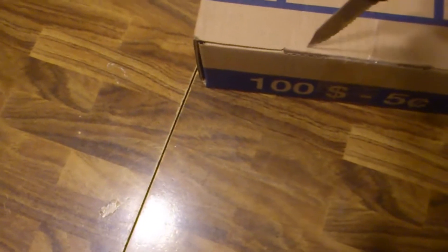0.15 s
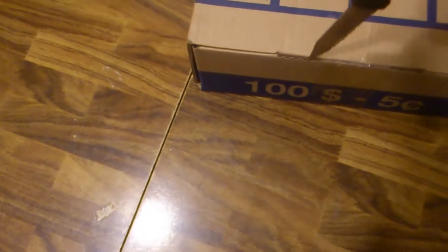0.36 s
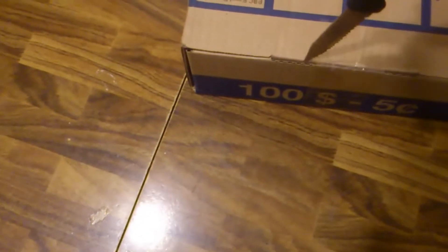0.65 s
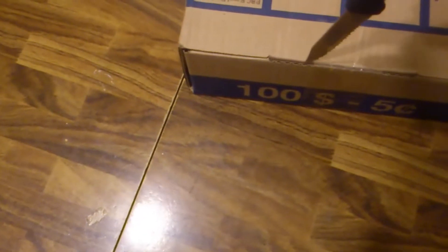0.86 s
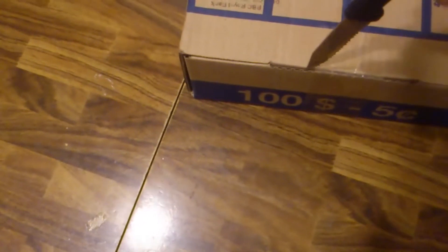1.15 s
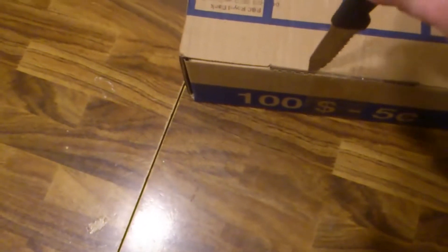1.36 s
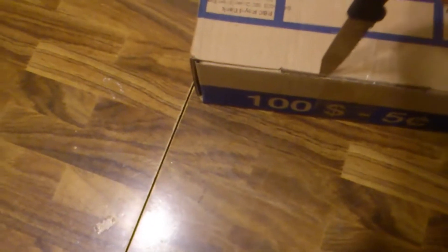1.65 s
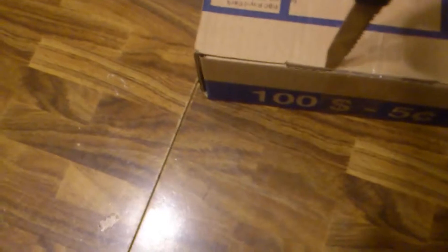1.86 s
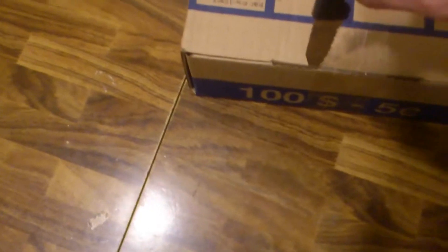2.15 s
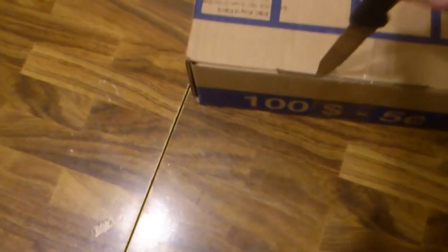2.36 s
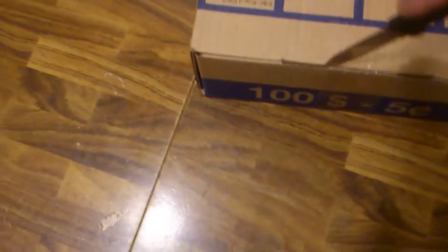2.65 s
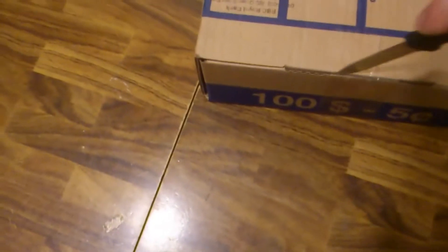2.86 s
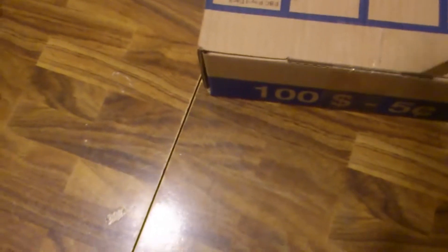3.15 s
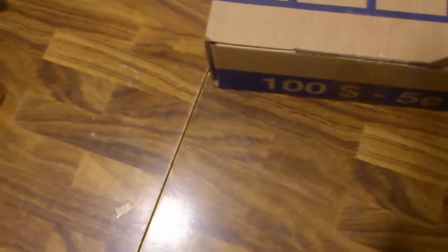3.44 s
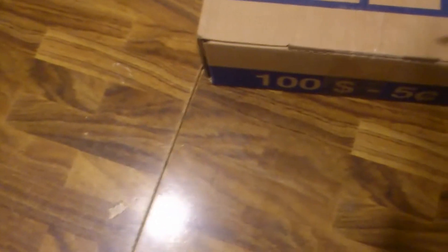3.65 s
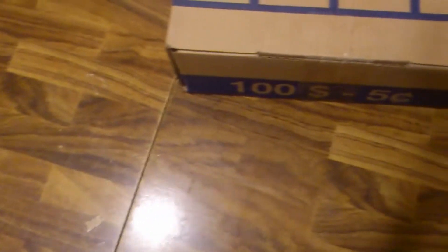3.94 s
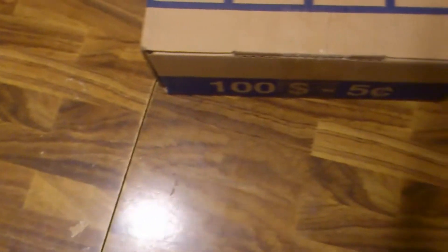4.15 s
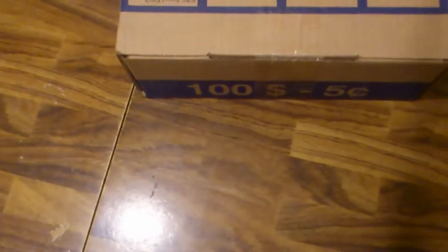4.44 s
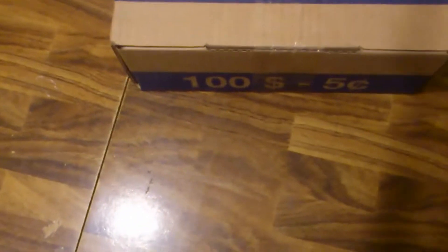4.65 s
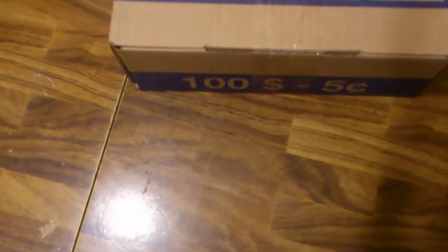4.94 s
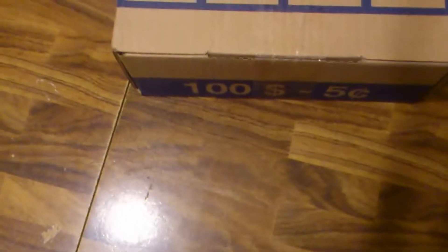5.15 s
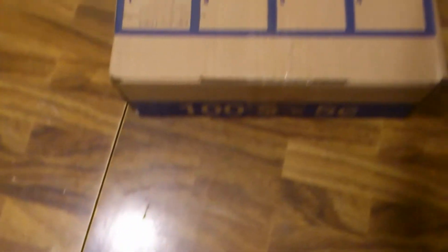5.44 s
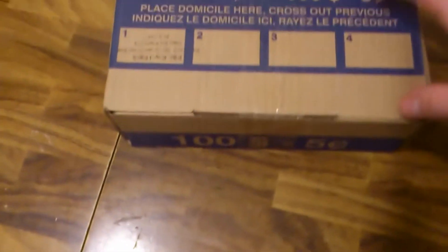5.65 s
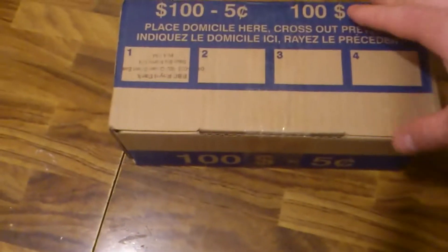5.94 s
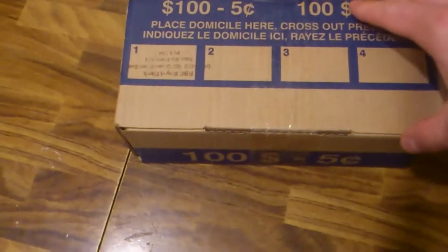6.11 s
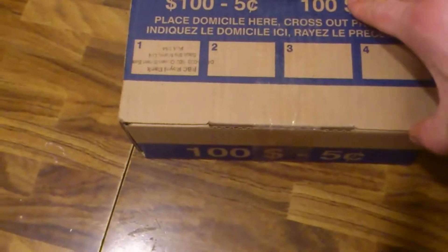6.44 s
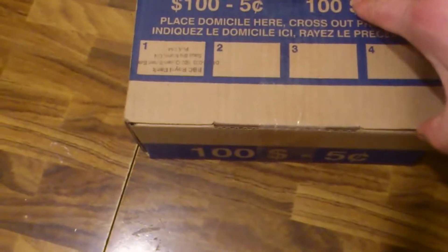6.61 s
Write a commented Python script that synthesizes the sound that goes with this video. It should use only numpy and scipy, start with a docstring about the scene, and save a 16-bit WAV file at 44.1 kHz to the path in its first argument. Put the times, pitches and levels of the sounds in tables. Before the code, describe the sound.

A knife snaps through tape on a cardboard box with sharp cracks and scrapes, then is laid down clattering before farther knocks and hand rustle.

```python
"""A knife pokes at and cuts through the tape of a cardboard box on a wooden table in a small quiet room:
tape snaps are noise bursts, the thumping box is a bank of decaying modes, and dragging is stick-slip grains.
The knife is laid down and bounces on ringing modes; knocks and a rattle sound farther off; a hand slides over
the cardboard. Heavy blows boom in table modes; noise echoes make the room, over filtered hiss and a low hum."""
import sys
import numpy as np
from scipy import signal
from scipy.fft import rfft, irfft
from scipy.io import wavfile

SR = 44100
rng = np.random.default_rng(int(sys.argv[2]) if len(sys.argv) > 2 else 0)


def how_loud(loudness_db):
    """Turn decibels into a plain amplitude multiplier (0 dB gives 1, 20 dB gives 10)."""
    steps = np.asarray(loudness_db, float) / 20
    return 10 ** steps


def wrap_up_sound(samples):
    """Save the sound to the file named by the first command line argument, as 16-bit audio."""
    columns = np.atleast_2d(samples).T
    # keep every value between -1 and 1, then stretch to whole-number steps
    tamed = np.clip(columns, -1, 1)
    steps = np.round(tamed * 32767).astype(np.int16)
    wavfile.write(sys.argv[1], SR, steps)


N = 298776

# Snaps and taps on the box:
# (time [s], crack peak [dB], crack centre [Hz], thump level [dB], thump centre [Hz])
TAPE_SNAPS = [(0.0677, -25, 2270, -41.5, 725), (0.0774, -33, 4670, -63, 422),
              (0.0929, -37, 1660, -35.5, 434), (0.7078, -32.5, 5950, -45, 475),
              (0.7198, -21, 3360, -40.5, 760), (0.7264, -46, 1680, -38, 434), (0.7444, -51, 1660, -37, 467),
              (0.9058, -36, 2130, -47.5, 547), (2.7626, -16, 2350, -35.5, 477),
              (2.7724, -20.5, 2800, -35, 880), (2.9045, -43, 2230, -51.5, 298),
              (2.9388, -11.5, 3900, -32.5, 364), (3.0899, -11, 1530, -21.5, 810),
              (3.0934, -17.5, 2200, -24.5, 465), (3.1624, -34, 3720, -42, 256),
              (3.1682, -14, 2120, -44, 355), (3.1971, -13.5, 2430, -21, 590), (3.2104, -25, 2200, -27, 240),
              (3.5059, -47, 2110, -32.5, 500), (3.5182, -33, 5040, -48, 463), (3.5321, -50, 2100, -53, 439),
              (3.5439, -24.5, 5290, -44, 312), (3.599, -50, 2830, -43, 440), (5.7289, -36.5, 880, -44, 506)]
# Light ticks of blade tip or finger, too weak to thump: (time [s], peak level [dB])
LIGHT_TICKS = [(0.6699, -49), (1.2925, -59), (1.3054, -50), (1.3574, -46.5), (1.3838, -49), (1.394, -45),
               (2.0595, -41.5), (2.076, -39), (2.1155, -49), (2.126, -44), (2.6677, -41), (5.878, -43),
               (6.3031, -41.5), (6.534, -45)]
# Blade strokes on cardboard, level before the swell:
# (loudest time [s], rise [s], fall [s], rasp level [dB], rasp centre [Hz])
BLADE_STROKES = [(0.079, 0.0045, 0.016, -39.5, 1570), (0.722, 0.027, 0.013, -40, 3580),
                 (0.906, 0.066, 0.022, -55, 2200), (1.308, .04, .03, -64, 2570),
                 (1.388, 0.15, 0.045, -60, 2600), (2.074, .035, 0.068, -48.5, 3350),
                 (2.118, 0.026, 0.044, -71, 3100), (2.914, 0.072, 0.09, -48, 3440),
                 (2.937, 0.0074, 0.023, -25.5, 4570), (3.094, 0.0065, 0.012, -19, 2920),
                 (3.167, .008, 0.011, -18.5, 3140), (3.205, 0.06, 0.038, -27, 3520),
                 (3.508, 0.023, 0.14, -37, 3360), (3.592, 0.039, 0.026, -35, 3520)]
# Wood shuddering on after a blow, of the box at first, from 4.7 s of the far knocks; level before the swell:
# (loudest time [s], fall [s], level [dB], centre [Hz], focus [dB per octave squared])
WOOD_SHUDDERS = [(0.082, 0.033, -36.5, 440, 122), (0.729, 0.047, -34.5, 488, 92),
                 (3.099, 0.31, -26.5, 626, 2.5), (3.17, 0.1, -47, 437, 11), (3.23, 0.087, -27, 410, 8),
                 (3.508, 0.051, -36, 370, 31), (4.738, 0.069, -38, 605, 200), (4.869, 0.13, -37, 610, 7),
                 (5.005, .15, -31, 700, 14), (5.062, 0.079, -30, 950, 8)]
# Knife landings: (time [s], steel level [dB], thump level [dB])
KNIFE_LANDINGS = [(4.336, -14, -35), (4.3537, -13.5, -32.5), (4.3774, -26, -34)]
# Hand strokes over the box, level before the swell:
# (loudest time [s], rise [s], fall [s], rasp level [dB], rasp centre [Hz])
HAND_STROKES = [(5.74, 0.017, 0.12, -60, 3700), (5.82, 0.31, 0.044, -52, 3600),
                (5.884, 0.079, .1, -47, 3720), (6.014, 0.046, 0.19, -50, 5000),
                (6.536, 0.0064, .08, -53.5, 3850), (6.635, 0.48, 0.31, -57.5, 2860)]
# Duller knocks farther off:
# (time [s], crack peak [dB], crack centre [Hz], thump level [dB], thump centre [Hz])
FAR_KNOCKS = [(4.7331, -43, 1490, -39.5, 605), (4.8659, -31.5, 1320, -32, 776), (5.0, -8, 4100, -35.5, 304),
              (5.0054, -34, 2300, -28, 605), (5.0162, -16.5, 1450, -41, 590),
              (5.0486, -11.5, 3050, -30, 218), (5.0675, -23.5, 2220, -61, 238)]
# Far rattles after the knocks, level before the swell:
# (loudest time [s], rise [s], fall [s], rasp level [dB], rasp centre [Hz])
FAR_RATTLES = [(4.869, .003, 0.13, -51, 1120), (5.002, 0.0027, 0.18, -29, 2700),
               (5.07, 0.043, 0.041, -27.5, 2140)]
# Modes of box and table top, for blows: (frequency [Hz], level [dB], t60 [s])
WOOD_MODES = [(193, -30, 0.03), (241.5, 1.5, 0.18), (312, 2.5, 0.086), (361, 0.5, 0.054), (435, -7.5, 0.17),
              (467, -10.5, 0.19), (528.6, -6.5, 0.15), (605, -3, 0.077), (742, -7, 0.1), (866, 4, 0.032),
              (1050, -4.5, 0.068), (1221, -6, 0.089)]
# Brief modes of the blade held in the hand: (frequency [Hz], level [dB], t60 [s])
HELD_BLADE_MODES = [(2220, -6, 0.023), (6400, -6, 0.0098), (10640, -4.5, 0.015), (14600, -3, 0.0088)]
# Broad modes of blade and handle, t60 before a cap: (frequency [Hz], level [dB], t60 [s])
KNIFE_MODES = [(1360, -8.5, 0.0099), (1850, -24, 0.053), (2770, -17.5, .04), (3200, -19, 0.037),
               (4000, -31, 0.036), (4290, -13.5, 0.017), (5050, -3, 0.0093), (5200, -25, 0.0094),
               (5600, -13, 0.006), (5820, -14, 0.0081), (6800, -37, 0.037), (7880, -15, 0.017),
               (9000, -40, 0.021), (10600, -12, 0.005), (14600, -7, 0.0022)]
# Heavier blows that set the table top booming: (time [s], level [dB])
TABLE_BOOMS = [(3.094, -59), (3.211, -43.5), (3.506, -59), (4.356, -52), (4.735, -54.5), (5.001, -35.5)]
# Low modes of the table top: (frequency [Hz], level [dB], t60 [s])
TABLE_MODES = [(112, -18, 0.2), (135.4, 4.5, 0.73)]
# The table shakes the microphone: (frequency [Hz], level [dB], t60 [s])
JOLT_MODES = [(30, -39, .2)]
# Decay of the room echo: (frequency [Hz], t60 [s])
ROOM_DECAY = [(150, 0.54), (500, 0.25), (2000, 0.34), (5000, 0.28), (12000, 0.37)]
# Microphone hiss, shape only: (frequency [Hz], relative density [dB per Hz])
HISS_SPECTRUM = [(12, -55), (20, -9.5), (133, -1.5), (220, -6), (283, -6.5), (325, -8.5), (364, -8),
                 (407, -9.5), (751, -12), (965, -13.5), (1140, -15), (15700, -25)]
# Wavering low hum: (frequency [Hz], nominal width [Hz], rms level [dB])
HUM_BANDS = [(40, 12, -70), (58, 2.6, -73.5), (130, 4.2, -77.5)]
# Faint hiss bands, level before they fade: (frequency [Hz], nominal width [Hz], rms level [dB])
FADING_BANDS = [(1480, 420, -60.5), (4220, 250, -66.5)]

WOOD_REACH_DB = 35   # selectivity of a near or far blow, per octave squared


def tape_snaps():
    """Fracture: breaking tape releases sharp cracks and strikes the box into modal vibration."""
    return blows(TAPE_SNAPS, edge_db=-13, ms=1.11, reach_db=WOOD_REACH_DB)


def blows(rows, edge_db, ms, reach_db):
    """Impact: a broadband crack and the modal thump of the wood are superposed."""
    s, peak_db, centre_hz, thump_db, thump_hz = np.transpose(rows)
    strengths_db = thump_db[:, None] + favour(thump_hz, reach_db)
    thump = strike(WOOD_MODES, s, strengths_db, spread_db=1.5)
    crack = cracks(s, peak_db, centre_hz, np.full(len(s), edge_db), ms)
    return crack + cut(thump, 95, "high")


def cracks(s, peak_db, centre_hz, edge_db, ms, splinter_db=-9):
    """Impulsive radiation: one sharp break and dying splinters, as a spectral hump plus a bright edge."""
    out, t = np.zeros(N + 2048), np.arange(2048) / SR
    decay = np.exp(-1000 * t / max(ms, .1))
    bursts = how_loud(splinter_db) * rng.standard_normal((len(s), len(t))) * decay
    bursts[:, 8] = 1   # the sharp break
    for k, burst in enumerate(bursts):
        hump = cut(burst, [centre_hz[k] / 5, centre_hz[k] * 1.89], "band")
        edge = cut(cut(burst, 3400, "high"), 7000, "low", order=1)
        crack = hump / np.abs(hump).max() + how_loud(edge_db[k]) * edge / np.abs(edge).max()
        at = round(s[k] * SR)
        out[at:at + len(t)] += how_loud(peak_db[k]) * crack
    return out[:N]


def strike(modes, s, strengths_db, spread_db):
    """Modal superposition: every blow excites every mode; strengths_db is blows x modes."""
    at, out = np.round(np.asarray(s) * SR).astype(int), np.zeros(N)
    gains = how_loud(strengths_db + spread_db * rng.standard_normal((len(at), len(modes))))
    for k, (hz, level_db, t60) in enumerate(modes):
        clicks = np.zeros(N)
        clicks[at] = gains[:, k] * how_loud(level_db) * (-1) ** k   # neighbouring modes alternate in sign
        out += ring(clicks, hz, t60)
    return out


def ring(clicks, hz, t60):
    """Damped resonance: a unit click sets off a decaying sine of initial height 1."""
    r, w = how_loud(-60 / (t60 * SR)), 2 * np.pi * hz / SR
    return signal.lfilter([0, np.sin(w)], [1, -2 * r * np.cos(w), r * r], clicks + 1e-18)


def favour(centre_hz, reach_db):
    """Selective excitation: the spot that is touched favours wood modes near its centre."""
    octaves = np.log2(np.array(WOOD_MODES)[:, 0] / np.asarray(centre_hz)[..., None])
    return -reach_db * octaves ** 2


def cut(x, hz, kind, order=2):
    """Linear filtering: a Butterworth response limits the band."""
    hz = np.clip(hz, 20, .45 * SR)
    return signal.sosfilt(signal.butter(order, hz, kind, fs=SR, output="sos"), x)


def ticks():
    """Light impact: dry cracks alike in colour; ticks and snaps ring the blade until it is laid down."""
    s, peak_db = np.transpose(LIGHT_TICKS)
    dry_cracks = cracks(s, peak_db, np.full(len(s), 2700), np.full(len(s), 2), ms=2.0)
    # The snaps ring the blade 15 dB less.
    touches = LIGHT_TICKS + [(s, db - 15) for s, db, *_ in TAPE_SNAPS]
    s, peak_db = np.transpose([row for row in touches if row[0] < KNIFE_LANDINGS[0][0]])
    return dry_cracks + strike(HELD_BLADE_MODES, s, peak_db[:, None], spread_db=1.5)


def blade_scrapes(grains, shaken):
    """Dry friction: the blade slips over cardboard in dense grains."""
    return dragging(BLADE_STROKES, 1.91, -18.5, grains, shaken)


def slips(per_s, grain_db):
    """Stick-slip friction: bunched grains are released, and each wood mode is shaken by them."""
    sizes = how_loud(grain_db * np.minimum(rng.exponential(1, N), 3)) * rng.choice([-1, 1], N)
    clumps = how_loud(5 * rms_one(cut(rng.standard_normal(N), 150, "low")))
    grains = (rng.random(N) < per_s * clumps / SR) * sizes
    # Modes under friction decay in half the time they take after a blow.
    shaken = np.array([how_loud(db) * ring(grains, hz, t60 / 2) for hz, db, t60 in WOOD_MODES])
    return grains, shaken


def dragging(strokes, width, sheen_db, grains, shaken):
    """Friction radiation: grains are heard as rasp, sizzle and sheen, and through the shaken wood."""
    out = np.zeros(N)
    rumble = how_loud(favour(700, 17)) @ shaken
    for s, rise_s, fall_s, rasp_db, rasp_hz in strokes:
        span, gain = swell(s, rise_s, fall_s)
        rasp = cut(grains[span], [rasp_hz / width, rasp_hz * width], "band", order=3)
        sizzle = cut(grains[span], 6300, "high", order=3)
        sheen = cut(grains[span], 8000, "high", order=3)
        layers = [(rasp, 0), (sizzle, -13), (sheen, sheen_db), (rumble[span], -6)]   # dB re rasp
        out[span] += gain * sum(rms_one(x) * how_loud(rasp_db + db) for x, db in layers)
    return out


def swell(s, rise_s, fall_s):
    """Amplitude envelope: the span of a stroke and its gain, growing to the loudest moment and back."""
    rise_s, fall_s = max(rise_s, .003), max(fall_s, .003)
    span = slice(round((s - rise_s) * SR), min(round((s + fall_s) * SR), N))
    along = np.interp(np.arange(N)[span] / SR, [s - rise_s, s, s + fall_s], [0, 1, 0])
    # A 33 dB slope, with its foot tapered to silence.
    return span, how_loud(33 * (along - 1)) * np.minimum(along / .15, 1)


def rms_one(x):
    """Power normalisation: scale to rms 1."""
    return x / np.sqrt(np.mean(x ** 2) + 1e-20)


def shudders(shaken):
    """Sustained modal excitation: the wood rings on roughly after blows on the box and after far knocks."""
    out = np.zeros(N)
    for s, fall_s, db, hz, reach_db in WOOD_SHUDDERS:
        span, gain = swell(s, 0.013, fall_s)
        out[span] += gain * how_loud(db) * rms_one(how_loud(favour(hz, reach_db)) @ shaken[:, span])
    return out


def knife_laid_down():
    """Repeated impact: each landing chatters, so the steel rings roughly while the table thumps."""
    s, steel_db, _ = np.transpose(KNIFE_LANDINGS)
    t = np.arange(SR // 5) / SR
    chatter = rng.standard_normal(len(t)) * (np.exp(-t / .003) + how_loud(-17) * np.exp(-t / .04))
    modes = [(hz, db, min(t60, .025)) for hz, db, t60 in KNIFE_MODES]
    steel = strike(modes, s, steel_db[:, None], spread_db=2)
    steel = signal.fftconvolve(steel, chatter / np.sqrt(np.sum(chatter ** 2)))[:N]
    landings = [(s, db - 6, 5200, thump_db, 520) for s, db, thump_db in KNIFE_LANDINGS]
    return steel + blows(landings, edge_db=-16, ms=2.3, reach_db=32)


def hand_slides():
    """Soft friction: a hand over cardboard releases denser grains than the blade."""
    return dragging(HAND_STROKES, 1.85, -7, *slips(per_s=13000, grain_db=4.0))


def far_knocks_and_rattle():
    """Impact and friction farther off: knocks and a rattle reach the ear with their treble reduced."""
    knocks = blows(FAR_KNOCKS, edge_db=-8, ms=9.1, reach_db=WOOD_REACH_DB)
    rattle = dragging(FAR_RATTLES, 2.2, -32, *slips(per_s=6000, grain_db=5.0))
    return cut(knocks + rattle, 4200, "low", order=3)


def table_top():
    """Plate resonance: heavy blows boom softly in low modes, and one jolt shakes the microphone."""
    s, level_db = np.transpose(TABLE_BOOMS)
    booms = cut(strike(TABLE_MODES, s, level_db[:, None], spread_db=1), [95, 160], "band")
    jolt = cut(strike(JOLT_MODES, [3.2], 0, spread_db=1), 40, "low")
    return booms + jolt


def room(x):
    """Diffuse reverberation: octave bands of noise each die at their own rate after a short gap."""
    t, tail = np.arange(SR // 2) / SR, 0
    for low_hz in 44 * 2. ** np.arange(9):
        band = cut(rng.standard_normal(len(t)), [low_hz, 2 * low_hz], "band")
        tail = tail + band * how_loud(-60 * t / at_hz(ROOM_DECAY, low_hz * np.sqrt(2)))
    tail = tail * np.clip((t - .003) / 0.0049, 0, 1)   # 3 ms gap, then a 4.9 ms onset
    tail = cut(tail / np.sqrt(np.sum(tail ** 2)), 3530, "low", order=1)
    return signal.fftconvolve(x, tail)[:N]


def at_hz(points, hz):
    """Logarithmic frequency scale: interpolate a table along it."""
    points = np.array(points)
    return np.interp(np.log(hz), np.log(points[:, 0]), points[:, 1])


def background():
    """Stationary noise: microphone hiss and narrow bands of wavering hum, with two bands that fade."""
    hiss = how_loud(-56.5) * colour(rng.standard_normal(N), HISS_SPECTRUM)
    hum = noise_bands(HUM_BANDS, 0.71)
    fading = noise_bands(FADING_BANDS, 1.9) * how_loud(-15 * np.arange(N) / SR)   # 15 dB per second
    return hiss + hum + fading


def noise_bands(bands, decay):
    """Resonance driven by noise: a t60 of decay / width makes each band narrow or broad."""
    return sum(how_loud(db) * rms_one(ring(rng.standard_normal(N), hz, decay / width)) for hz, width, db in bands)


def colour(x, spectrum):
    """Spectral shaping: weight a steady sound by frequency, at rms 1."""
    hz = np.maximum(np.fft.rfftfreq(N, 1 / SR), 1)
    return rms_one(irfft(rfft(x) * how_loud(at_hz(spectrum, hz)), N))


def scene():
    """Superposition: near sounds, far sounds, their echo, the table top and the background add."""
    grains, shaken = slips(per_s=5000, grain_db=3.5)
    near = tape_snaps() + ticks() + blade_scrapes(grains, shaken) + shudders(shaken)
    near = near + knife_laid_down() + hand_slides()
    far = far_knocks_and_rattle()
    echo = room(how_loud(-3.5) * cut(near, 590, "high", order=1) + how_loud(-0.5) * far)
    sounds = cut(near + far + echo, 123, "high", order=4)   # small things radiate no deep bass
    return (sounds + table_top() + background())[None]


def top_cut(x):
    """Nothing passes above the cut-off."""
    return signal.sosfilt(signal.butter(12, 16970, fs=SR, output="sos"), x)


def record(dry):
    """Recording: the finished mix is taken as a single channel."""
    return top_cut(dry)


dry = scene()
out = record(dry)
wrap_up_sound(out)
```